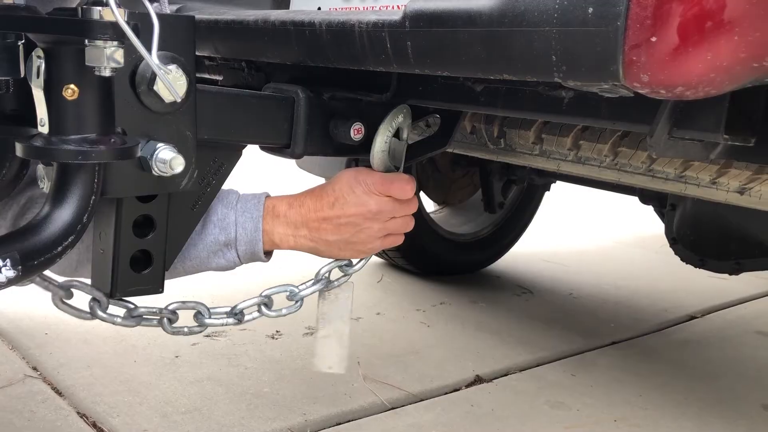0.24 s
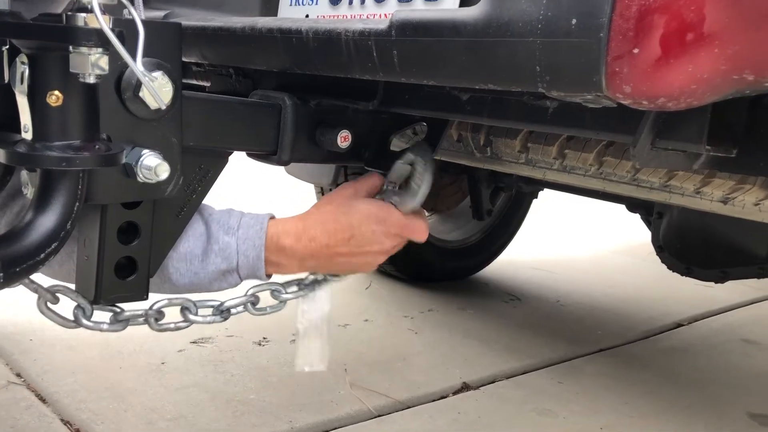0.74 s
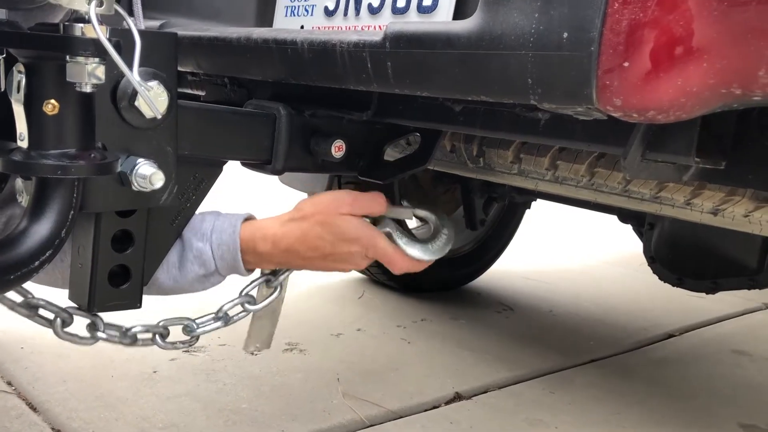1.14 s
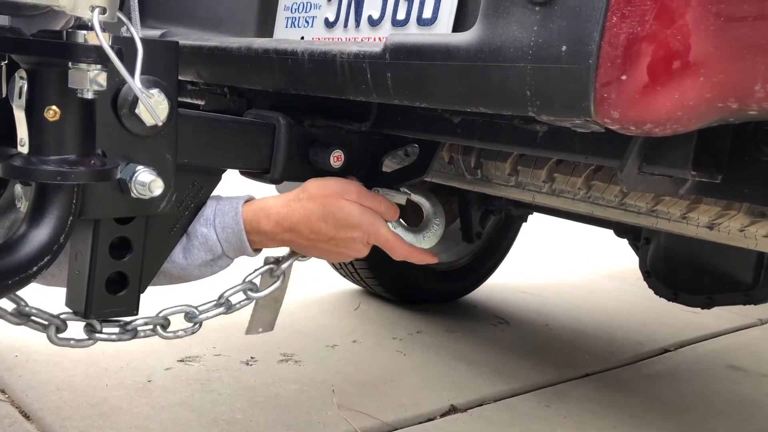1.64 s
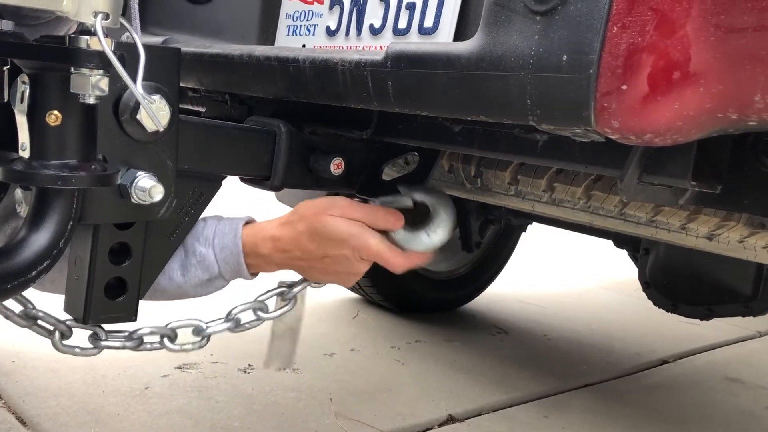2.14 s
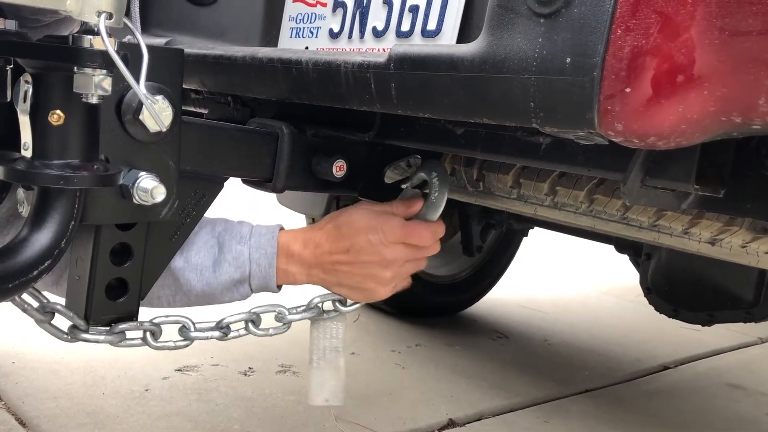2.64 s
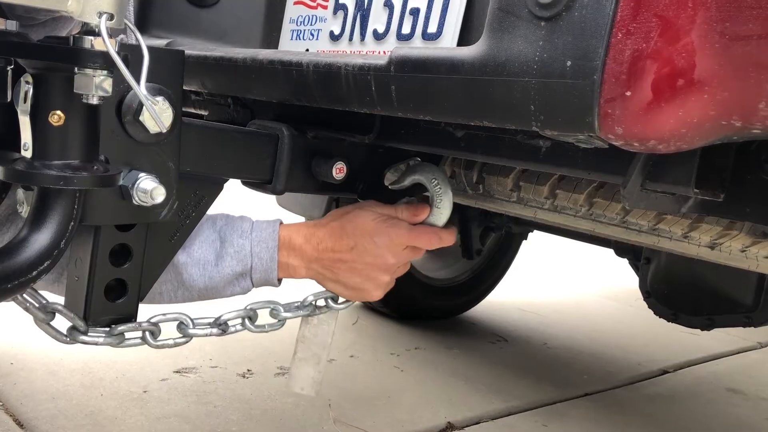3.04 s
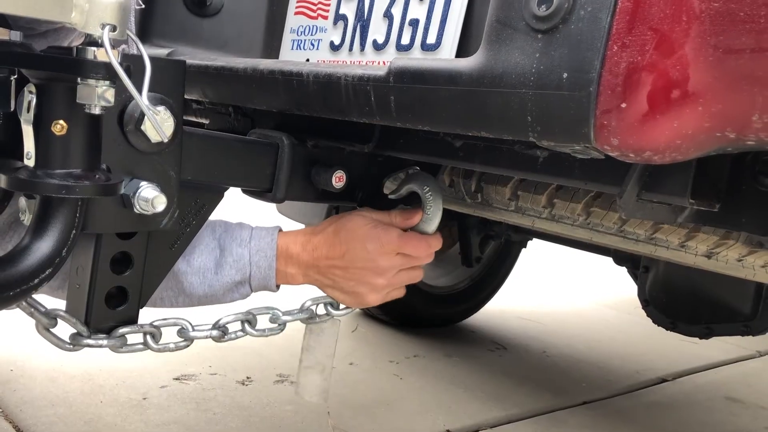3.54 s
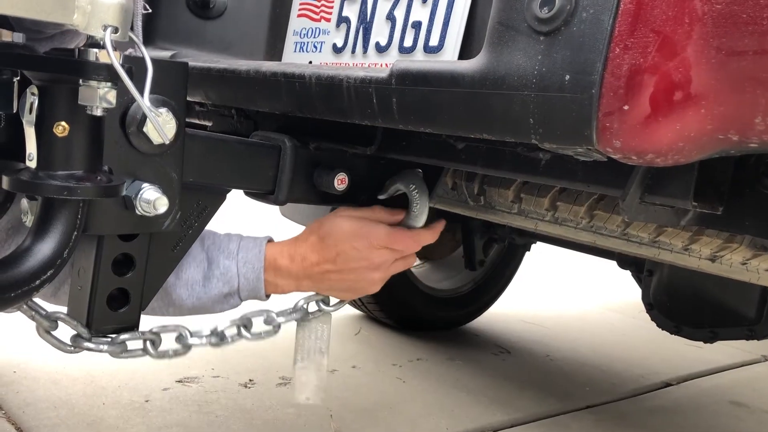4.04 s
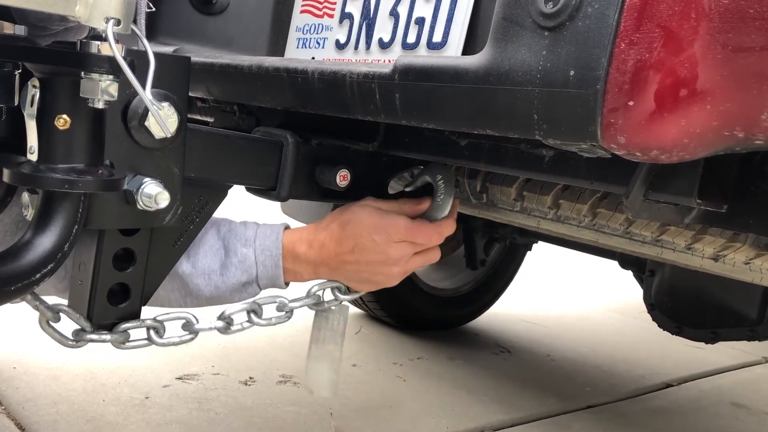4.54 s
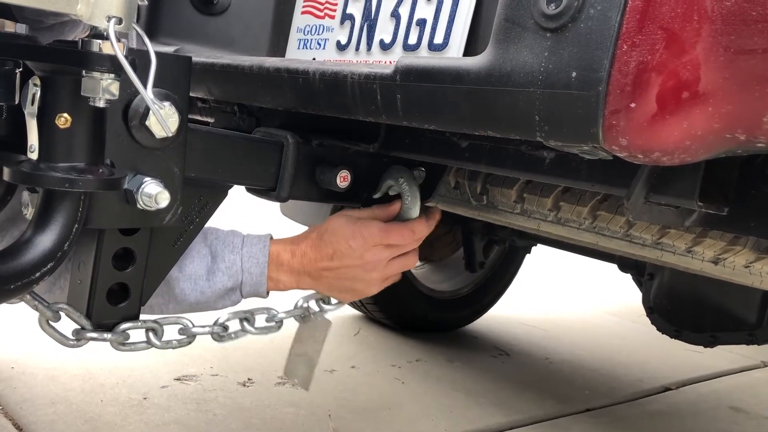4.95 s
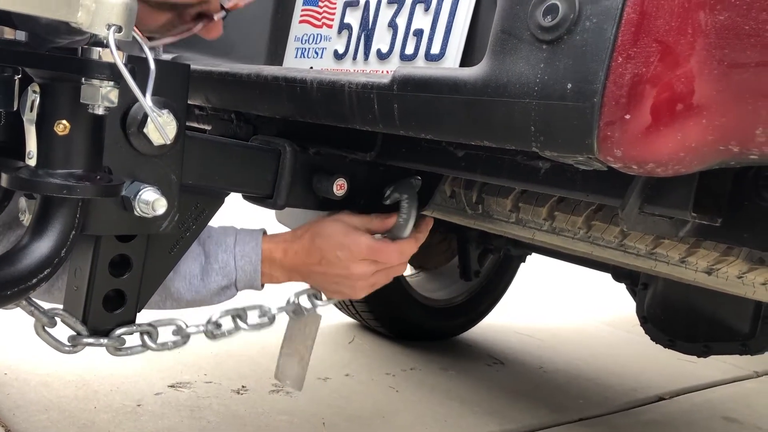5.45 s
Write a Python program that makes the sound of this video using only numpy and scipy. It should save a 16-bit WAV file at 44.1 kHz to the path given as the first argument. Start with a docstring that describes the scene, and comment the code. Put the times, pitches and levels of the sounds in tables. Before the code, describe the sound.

A steel safety chain is hooked onto a trailer hitch outdoors, heard close and dry in one channel. A low distant rumble with a little hiss continues throughout, with faint wavering rubbing of links. From 0.1 to 0.5 s there are light taps and a barely audible thin squeak; a short scrape comes near 0.8 s. Small knocks cluster around 1.45 s, with tiny squeaks up to 2.2 s and a bright knock at 2.0 s. A rasp and a firm double-edged clank land at 2.4-2.5 s, then a moderate knock at 2.9 s. Thin high tinks start at 3.6 s, with soft scrapes near 3.8-4.0 s and a knock at 4.1 s. Two loud clanks strike at 4.48 and 4.77 s, each led by a scrape, ringing briefly with a low panel boom; the first carries a very high, thin ring. Link tinks at 5.2-5.35 s and light knocks at 5.5 and 5.7 s finish.

```python
"""A concrete drive outdoors, close to a parked truck: a steel safety chain is hooked onto its hitch.
Behind it lies a low rumble with a little hiss, made of coloured noise; the chain's links rub faintly.
Slack links tink as thin damped tones; the hook squeaks in wavering tones and scrapes as strewn tiny slips.
The hook knocks on the receiver and drops home with two loud clanks, the first with one very high thin ring;
damped modes and dense noise ring after each blow, and the truck's body panels boom under four of them."""
import sys
import numpy as np
from scipy import signal
from scipy.fft import rfft, irfft
from scipy.io import wavfile

SR = 44100
rng = np.random.default_rng(int(sys.argv[2]) if len(sys.argv) > 2 else 0)


def master(y):
    """Save y as 16-bit WAV."""
    cut = np.clip(np.atleast_2d(y).T, -1, 1)
    pcm = np.round(cut * 32767)  # scale
    wavfile.write(sys.argv[1], SR, pcm.astype(np.int16))


N = 251370   # length [samples]
RING_S = 0.5   # time allowed for each contact to ring [s]
MODE_SPREAD_DB = 2.0   # how much each mode's strength differs from one contact to the next [dB]


def from_db(db):
    """Decibels to gain."""
    return 10 ** (np.asarray(db) / 20)


def rms_one(x):
    """Scale to unit rms."""
    return x / np.sqrt(np.mean(x ** 2) + 1e-20)


def band(x, low_hz, high_hz):
    """Steep causal band-pass; the upper edge stays below 0.45 of the sample rate."""
    edges = [low_hz, min(high_hz, 0.45 * SR)]
    return signal.sosfilt(signal.butter(4, edges, "band", fs=SR, output="sos"), x + 1e-18)


def coloured(x, spectrum, ripple_db=0, ripple_hz=110):
    """Give a steady signal a spectrum, with chance peaks and dips where crowded modes add or cancel; rms 1."""
    hz, db = np.transpose(spectrum)
    bins_hz = np.maximum(np.arange(len(x) // 2 + 1) * SR / len(x), 1)
    ripple = np.interp(bins_hz / ripple_hz, np.arange(1000), rng.standard_normal(1000))
    gain_db = np.interp(np.log(bins_hz), np.log(hz), db) + ripple_db * ripple
    return rms_one(irfft(rfft(x) * from_db(gain_db), len(x)))


def dying(t, t60):
    """Exponential decay, 60 dB down after t60 seconds."""
    return np.exp(-np.log(1000) * t / t60)


def ring(modes, t, spread_db, twin_db=-6, detune=0.0079):
    """Damped sines, weighted differently at every contact; each beats against a weaker near twin."""
    hz, db, t60 = np.transpose(modes)[:, :, None]
    strength = from_db(db + spread_db * rng.standard_normal(hz.shape))
    strength = strength * rng.choice([-1, 1], hz.shape)
    twin_hz = hz * (1 + detune * rng.standard_normal(hz.shape))
    tone = np.sin((2 * np.pi * hz * t).astype(np.float32))
    twin = np.sin((2 * np.pi * twin_hz * t).astype(np.float32))
    return np.sum(strength * (tone + from_db(twin_db) * twin) * dying(t, t60), axis=0)


def favour(modes, favoured_hz, favour_db, width):
    """The point of contact drives the modes near one pitch hardest; width is in log pitch."""
    hz, db, t60 = np.transpose(modes)
    nearness = np.exp(-(np.log(hz / favoured_hz) / width) ** 2)
    return np.transpose([hz, db + favour_db * nearness, t60])


def uneven(size, spread_db, per_s):
    """A gain that wanders at random, per_s new values a second."""
    steps = rng.standard_normal(4000)
    return from_db(spread_db * np.interp(np.arange(size) / SR * per_s, np.arange(len(steps)), steps))


def stressed(x, hz, q, db):
    """Add a resonance to a steady signal of rms 1."""
    resonance = signal.lfilter(*signal.iirpeak(hz, q, fs=SR), x)
    return x + from_db(db) * rms_one(resonance)


def add(out, s, sound):
    """Mix a sound in at a time in seconds."""
    start = max(round(s * SR), 0)
    out[start:start + len(sound)] += sound[:max(N - start, 0)]


# colour of the open air around the drive: (frequency [Hz], relative density [dB per Hz])
AIR_COLOUR = [(13, -46), (22, -16), (100, 1.5), (189, 0), (420, -14.5), (496, -13.5), (636, -16),
              (710, -17.5), (1490, -29), (1970, -36), (4500, -35), (6270, -43), (8490, -41.5), (11500, -45),
              (16000, -47)]
AIR_DB = -42.5   # rms level
SWELL_AT_S, SWELL_WIDTH_S, SWELL_DB = 3.95, 0.18, -45


def outdoors():
    """Steady distant rumble with a little hiss, as coloured noise; its lowest part swells once."""
    t = np.arange(N) / SR
    swell = from_db(SWELL_DB) * np.exp(-((t - SWELL_AT_S) / SWELL_WIDTH_S) ** 2)
    deep = rms_one(band(rng.standard_normal(N), 40, 127)) * swell
    return from_db(AIR_DB) * coloured(rng.standard_normal(N), AIR_COLOUR) + deep


# modes of the receiver and frame: (frequency [Hz], relative level [dB], t60 [s])
RECEIVER_MODES = [(452.2, -2, 0.34), (566.3, 3, 0.18), (599.6, 4, 0.27), (681, -8.5, 0.21),
                  (935, -5.5, 0.21), (1041, 2, 0.12), (1127, -7.5, 0.24), (1226, -8.5, 0.28),
                  (1310, -3, 0.11), (1402, 1.5, 0.095), (1508, -10, 0.3), (1736, -11.5, 0.2),
                  (1980, -8, 0.17), (2192, -5.5, 0.15)]
# modes of the hook and its nearest links: (frequency [Hz], relative level [dB], t60 [s])
HOOK_MODES = [(2430, -8.5, 0.13), (2950, -5.5, 0.28), (3145, 4.5, 0.11), (3222, -14, 0.12),
              (3400, -26, 0.12), (3630, -12.5, 0.22), (3500, -3.5, 0.094), (3740, 7, 0.046),
              (4060, 0, 0.13), (4470, 0.5, 0.092), (4765, 3, 0.014), (4820, -12.5, 0.12),
              (4880, -12.5, 0.19), (5740, -25, 0.0338), (6000, -4.5, 0.038), (5600, -7, 0.037),
              (6400, -24.5, 0.17), (6510, -15, 0.14), (7280, -15.5, 0.061), (8650, -10.5, 0.11),
              (9000, -21.5, 0.14), (9360, 11.5, 0.096), (10000, 8, 0.029), (9800, -20.5, 0.35),
              (12100, 0.5, 0.053), (12300, -7, .06), (13600, -21.5, 0.11), (14600, -7.5, 0.066)]
# colour of sliding steel: (frequency [Hz], relative density [dB per Hz])
SLIDE_COLOUR = [(180, -47.5), (300, 14), (574, -2.5), (713, -7), (1030, -2), (1210, -5.5), (1410, -5.5),
                (2360, -13.5), (3190, -7), (4090, -10.5), (6100, -10), (7440, -19.5), (8500, -16.5),
                (12900, -27), (16000, -23)]


def friction(size, per_s, modes_db, ripple_db, smear_t60=0.061):
    """Tiny slips of steel on steel, each ringing briefly in hook and receiver; rms 1."""
    slips = (rng.random(size) < per_s / SR) * rng.standard_normal(size)
    t = np.arange(SR // 5) / SR
    grit = rms_one(rng.standard_normal(len(t)) * dying(t, smear_t60))
    ringing = rms_one(ring(RECEIVER_MODES, t, MODE_SPREAD_DB) + ring(HOOK_MODES, t, MODE_SPREAD_DB))
    rub = signal.fftconvolve(slips, grit + from_db(modes_db) * ringing)[:size]
    return coloured(rub, SLIDE_COLOUR, ripple_db)


# faint rubbing of the carried chain: (time [s], relative level [dB])
STIR_LEVELS = [(0.0, -58.5), (0.32, -54), (0.46, -54), (1.27, -62), (1.49, -52), (1.87, -56), (2.6, -52.5),
               (3.22, -70.5), (3.49, -59), (3.83, -50.5), (4.05, -51), (4.19, -54.5), (4.43, -63.5),
               (4.62, -55), (4.98, -56.5), (5.18, -64), (5.41, -60.5), (5.7, -51)]
STIR_WAVER_DB, STIR_WAVERS_PER_S = 2, 15


def stirring(level_db=-4.5):
    """The links rub faintly as long as the chain is held: many small slips, wavering in level."""
    s, db = np.transpose(STIR_LEVELS)
    slips = friction(size=N, per_s=1600, modes_db=-3.5, ripple_db=0.0, smear_t60=0.08)
    rub = rms_one(band(slips, 2600, 5550))
    level = from_db(np.interp(np.arange(N) / SR, s, db) + level_db)
    return rub * uneven(N, STIR_WAVER_DB, STIR_WAVERS_PER_S) * level


# link on link: (time [s], relative level [dB], favoured mode [Hz])
TINKS = [(0.014, -40, 8770), (1.081, -50, 8770), (1.8726, -42, 5430), (3.6147, -25.5, 9800),
         (3.8242, -34.5, 10100), (3.8796, -39, 8630), (4.1914, -34, 5600), (4.326, -41.5, 10100),
         (5.1677, -31.5, 10000), (5.2642, -25.5, 10100), (5.2794, -27, 10100), (5.3168, -28.5, 10100),
         (5.3445, -40.5, 9940)]
# modes of a link: (frequency [Hz], relative level [dB], t60 [s])
LINK_MODES = [(5480, -14.5, 0.16), (8740, 1.5, 0.084), (9500, -10, .07), (10070, 1, 0.077),
              (11820, -10, .07), (14310, -11, .08), (15100, -9, .07)]


def links(level_db=-21, tick_db=3, tick_t60=0.05):
    """Small links touch: a noisy tick and a thin high ring of damped modes."""
    t, out = np.arange(int(RING_S * SR)) / SR, np.zeros(N)
    for s, db, hz in TINKS:
        tick = band(rng.standard_normal(len(t)) * dying(t, tick_t60), 5600, 13000)
        tones = ring(favour(LINK_MODES, hz, favour_db=6.5, width=0.07), t, MODE_SPREAD_DB)
        add(out, s, from_db(db + level_db) * (tones + from_db(tick_db) * tick))
    return out


# blows that shake the truck's body: (time [s], relative level [dB])
THUDS = [(1.74, -41.5), (2.914, -33.5), (4.479, -30), (4.774, -29)]
# body panels: (frequency [Hz], relative level [dB], t60 [s])
PANEL_MODES = [(119.9, -1.5, 0.47), (154.4, -0.5, 0.44), (201.6, 0.5, 0.19), (291, -0.5, 0.28),
               (302, -16, 0.12)]


def body(build_s=0.0057, level_db=-3):
    """Panels boom briefly under some blows: low damped modes that take a moment to build up."""
    t, out = np.arange(int(RING_S * SR)) / SR, np.zeros(N)
    build = 1 - np.exp(-t / build_s)
    for s, db in THUDS:
        add(out, s, from_db(db + level_db) * ring(PANEL_MODES, t, MODE_SPREAD_DB) * build)
    return out


# thin tones of the steel: the hook squeaks, and one very high ring sounds with the loud clank:
# (time [s], length [s], pitch [Hz], peak level [dB])
THIN_TONES = [(0.489, 0.13, 2915, -53.5), (1.555, 0.067, 6510, -57), (1.583, 0.036, 2965, -45.5),
              (1.989, 0.033, 2980, -35), (2.19, 0.064, 2912, -48), (4.475, .025, 13980, -21)]


def thin_tones(waver=0.0014):
    """The steel sings at one pitch: a sine that swells and fades, wavering more the higher it lies."""
    t, out = np.arange(int(RING_S * SR)) / SR, np.zeros(N)
    for s, length_s, hz, db in THIN_TONES:
        wander = np.cumsum(rng.standard_normal(len(t))) * waver * hz / np.sqrt(SR)
        swell = np.sin(np.pi * np.minimum(t / length_s, 1))
        add(out, s, from_db(db) * swell * np.sin(2 * np.pi * hz * t + wander))
    return out


# hook sliding on the receiver: (time of full pressure [s], held [s], relative frame level [dB],
# relative hook level [dB], groan of the receiver [Hz], rasp of the hook [Hz])
SLIDES = [(0.785, 0.062, -39, -42, 1400, 6300), (2.427, 0.03, -44, -32.5, 1220, 6300),
          (2.705, 0.0044, -38.5, -43.5, 1220, 6500), (3.773, 0.0033, -41, -47.5, 586, 4200),
          (3.914, 0.005, -40.5, -77, 593, 3600), (3.973, .024, -37.5, -38, 1220, 3400),
          (4.452, 0.042, -35.5, -34, 1220, 3150), (4.718, 0.069, -36, -32.5, 1140, 3400),
          (4.963, 0.038, -41.5, -45, 610, 4000)]
# a stroke swells as the hand presses, and fades as it lets go
PRESS_DB_PER_S, RELEASE_DB_PER_S = 273.5, 260
# sliding steel catches and lets go
CATCH_DB, CATCHES_PER_S = 1.8, 130


def scraping(frame_db=-1, hook_db=-1):
    """The hook drags over the receiver in short strokes, each on a different spot: it swells, holds and fades."""
    out = np.zeros(N)
    t = np.arange(SR) / SR - 0.25   # zero when full pressure is reached
    for s, held_s, low_db, high_db, groan_hz, rasp_hz in SLIDES:
        rub = friction(size=len(t), per_s=3200, modes_db=-8, ripple_db=3.5)
        groan = rms_one(band(stressed(rub, groan_hz, q=1.3, db=0.5), 376, 2000))
        rasp = rms_one(band(stressed(rub, rasp_hz, q=15.0, db=-17), 2190, 15000))
        stroke = groan * from_db(low_db + frame_db) + rasp * from_db(high_db + hook_db)
        press_db = PRESS_DB_PER_S * np.minimum(t, 0)
        release_db = RELEASE_DB_PER_S * np.maximum(t - held_s, 0)
        pressure = from_db(press_db - release_db)
        add(out, s + t[0], pressure * uneven(len(t), CATCH_DB, CATCHES_PER_S) * stroke)
    return out


# the steel is loudest around its favoured mode: boost in the hook and in the frame's deep range, width in log pitch
CONTACT_DB, DEEP_CONTACT_DB, CONTACT_WIDTH = 7, 12.5, 0.37


def contact(hz, favoured_hz):
    """Nearness, 0-1, to the mode that the point of contact favours."""
    return np.exp(-(np.log(hz / favoured_hz) / CONTACT_WIDTH) ** 2)


# how the steel answers, by frequency range: (low edge [Hz], high edge [Hz], relative crack level [dB],
# build-up [s], tail t60 [s], level of ringing modes against the clatter [dB])
RANGES = [(271.6, 864, -5.5, 0.0084, 0.36, -1), (745, 2260, 6.5, 0.0096, 0.28, 1.5),
          (2660, 5270, 7, 0.0028, .15, -1), (5055, 6930, 3, 0.0059, 0.088, 6),
          (7650, 11570, 1, 0.0016, 0.055, -8), (11620, 35000, -14, 0.0021, .11, 15.5)]
# a blow with the hook's thick bow rings low and drives the frame's deep modes;
# towards the tip it rings higher and weighs less
BOW_HZ, DEEP_DB, TIP_LOSS_DB_PER_OCTAVE = 3780, -5.5, 19


def blow_levels(frame_db, hook_db, db_per_octave, receiver_hz, hook_hz):
    """The frame takes the lowest two ranges, the hook the rest, tilted by the hardness of the contact."""
    deep_hz, _, *hook_centres = [np.sqrt(low * high) for low, high, *_ in RANGES]
    hook_centres = np.array(hook_centres)
    tip_octaves = max(np.log2(hook_hz / BOW_HZ), 0)
    deep_db = frame_db + DEEP_DB - TIP_LOSS_DB_PER_OCTAVE * tip_octaves
    deep_db = deep_db + DEEP_CONTACT_DB * contact(deep_hz, receiver_hz)
    treble_db = hook_db + db_per_octave * np.log2(hook_centres / hook_centres[0])
    treble_db = treble_db + CONTACT_DB * contact(hook_centres, hook_hz)
    return [deep_db, frame_db, *treble_db]


# colour of the dense, unresolved ringing: (frequency [Hz], relative density [dB per Hz])
CLATTER_COLOUR = [(150, -38), (250, -2), (586, -6.5), (775, -8), (1200, -2.5), (1640, -9), (2400, -12.5),
                  (3060, -8), (3340, -8), (3650, -6.5), (6360, -25.5), (7310, -15), (12500, -26.5),
                  (14400, -19.5), (16000, -56)]


def clank(levels_db, receiver_hz, hook_hz, crack_t60=0.087, linger_db=-21, linger_t60=0.36,
          snap_db=7, snap_t60=0.0085, glance_range_db=15):
    """One blow: a crack in the hook, its modes, then dense ringing that spreads through the frame."""
    t = np.arange(int(RING_S * SR)) / SR
    tones = ring(favour(RECEIVER_MODES, receiver_hz, favour_db=12, width=0.09), t, MODE_SPREAD_DB)
    tones = tones + ring(favour(HOOK_MODES, hook_hz, favour_db=20, width=0.037), t, MODE_SPREAD_DB)
    dense = coloured(rng.standard_normal(len(t)), CLATTER_COLOUR, ripple_db=3.5)
    # a glancing blow hardly moves the receiver and spends itself in a short snap
    glancing = np.clip((levels_db[2] - levels_db[1]) / glance_range_db, 0, 1)
    snap = 1 + glancing * from_db(snap_db) * dying(t, snap_t60)
    attack = t < 0.025   # each range's level is set over this opening
    out = 0
    for level_db, (low_hz, high_hz, crack_db, build_s, t60, modes_db) in zip(levels_db, RANGES):
        crack = from_db(crack_db) * dying(t, crack_t60)
        build = 1 - np.exp(-t / build_s)   # the heavy frame is slow to take up the blow
        tail = dying(t, t60) + from_db(linger_db) * dying(t, linger_t60)
        clatter = band(dense * snap * (crack + build * tail), low_hz, high_hz)
        ringing = band(tones * snap * (1 - np.exp(-2 * t / build_s)), low_hz, high_hz)
        part = rms_one(clatter) + from_db(modes_db) * rms_one(ringing)
        out = out + from_db(level_db) * part / np.std(part[attack])
    return out


# hook on hitch: (time [s], frame level [dB], hook level before tilt and contact boost [dB],
# brightness [dB per octave], favoured receiver mode [Hz], favoured hook mode [Hz])
CLANKS = [(0.104, -51.5, -62.5, -21, 483, 2800), (0.286, -50.5, -55.5, -1, 680, 3760),
          (0.3504, -46, -37, -5.5, 2300, 3070), (0.38, -45.5, -53.5, -4, 680, 2870),
          (0.416, -55, -60.5, -14, 1030, 3530), (0.507, -52.5, -54, -7, 690, 3570),
          (0.853, -42.5, -59, 0, 1410, 6010), (0.918, -57, -53.5, -24, 1200, 4200),
          (0.969, -77, -49.5, -9.5, 2050, 4670), (1.263, -37, -48.5, -26, 1730, 4320),
          (1.377, -67, -52, -1.5, 1100, 3490), (1.438, -60, -55.5, 2.5, 1030, 3680),
          (1.457, -36, -41.5, -7, 980, 3070), (1.482, -41.5, -38, -3.5, 1200, 2800),
          (1.6197, -54, -54, -16, 1290, 4680), (1.737, -40, -57, -1, 695, 3400),
          (2.0057, -42.5, -34.5, -1.5, 1220, 4654), (2.058, -46, -50.5, -5, 1220, 3040),
          (2.195, -89.5, -55, -4.5, 1880, 2870), (2.23, -78, -57, -3, 960, 4460),
          (2.281, -43, -80, -8, 1750, 4900), (2.3685, -46, -40.5, -4, 1000, 6150),
          (2.399, -32, -30, -4, 1040, 6150), (2.4675, -22.5, -28, -4.5, 1236, 6160),
          (2.476, -29, -35, -5, 1240, 6460), (2.708, -50, -49, -2, 1490, 3180),
          (2.889, -33.5, -45.5, -10, 970, 3900), (2.9098, -29, -37.5, -6.5, 705, 3460),
          (2.962, -51, -54, 0.5, 1020, 4700), (3.241, -46, -58, -13, 1590, 3100),
          (3.644, -56, -56.5, -1, 596, 3660), (4.076, -31, -35, -10, 1890, 4240),
          (4.476, -19.5, -19.5, -5, 1210, 3140), (4.486, -32, -31, -12, 1240, 3240),
          (4.519, -39, -36, 0.5, 1240, 3160), (4.587, -46.5, -53.5, -2.5, 1210, 3210),
          (4.645, -57, -52.5, -4, 1030, 3960), (4.6545, -68, -42, 0, 1430, 5860),
          (4.773, -22, -19, -7, 1100, 3550), (4.783, -29, -30.5, -4, 670, 3620),
          (5.044, -55.5, -58, -6, 1140, 5150), (5.11, -82, -45, 0, 940, 3690),
          (5.137, -60, -50.5, -4.5, 940, 3500), (5.4878, -47.5, -44, -5.5, 2190, 3290),
          (5.69, -54, -44.5, -13, 1370, 3130)]


def hook():
    """All knocks of the hook on the hitch, each shared out between frame and hook."""
    out = np.zeros(N)
    for s, frame_db, hook_db, db_per_octave, receiver_hz, hook_hz in CLANKS:
        levels_db = blow_levels(frame_db, hook_db, db_per_octave, receiver_hz, hook_hz)
        add(out, s, clank(levels_db, receiver_hz, hook_hz))
    return out


def scene():
    """Hook, chain and truck close by, in the open air; one channel."""
    background = outdoors() + stirring()
    chain_and_truck = links() + body()
    hitching = thin_tones() + scraping() + hook()
    return (background + chain_and_truck + hitching)[None]


def record(dry):
    """One microphone channel: the deepest rumble is cut, the loudest peaks are rounded and the top is cut."""
    lean = signal.sosfilt(signal.butter(4, 34, "high", fs=SR, output="sos"), dry)
    rounded = lean / (1 + lean ** 6) ** (1 / 6)
    return signal.sosfilt(signal.ellip(10, 0.1, 70, 16200, fs=SR, output="sos"), rounded)


dry = scene()
out = record(dry)
master(out)
```